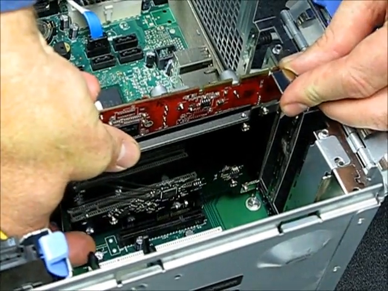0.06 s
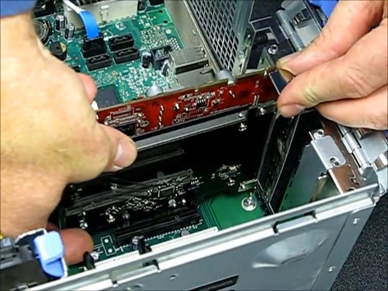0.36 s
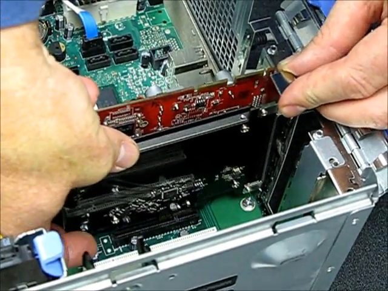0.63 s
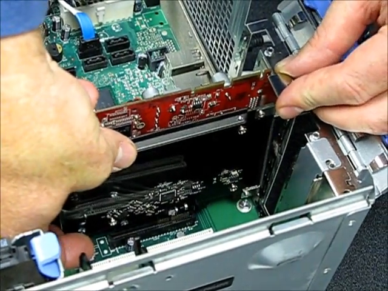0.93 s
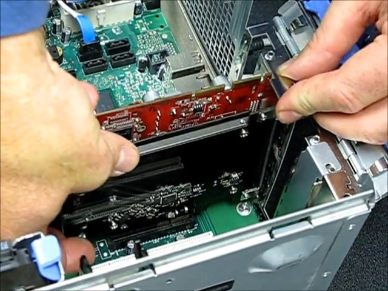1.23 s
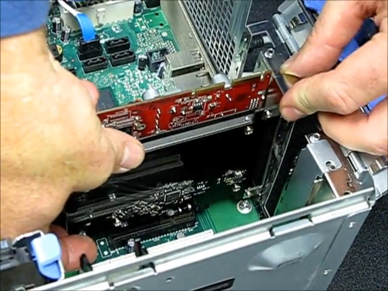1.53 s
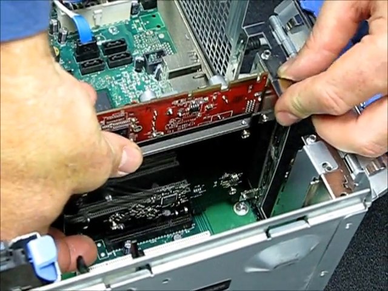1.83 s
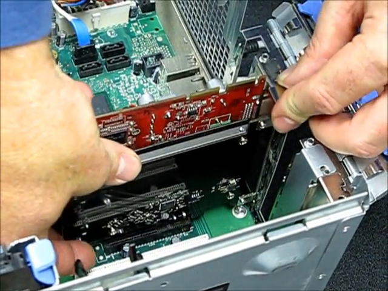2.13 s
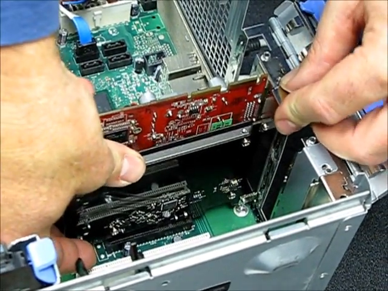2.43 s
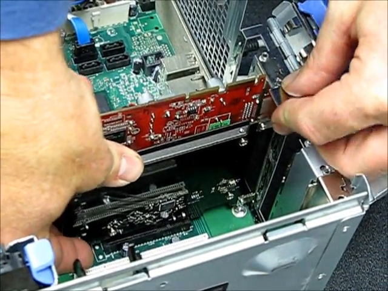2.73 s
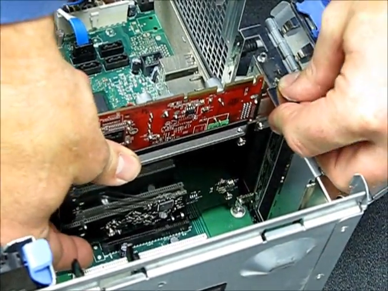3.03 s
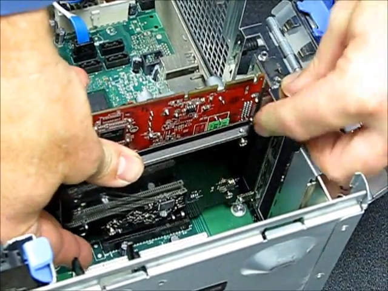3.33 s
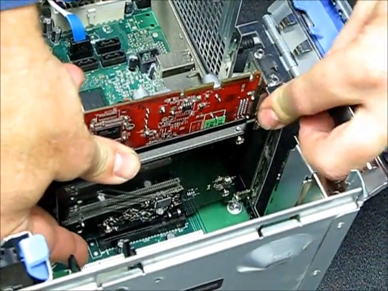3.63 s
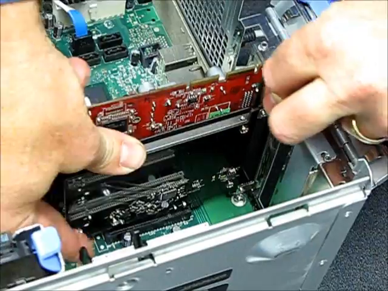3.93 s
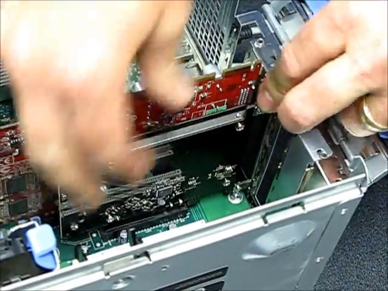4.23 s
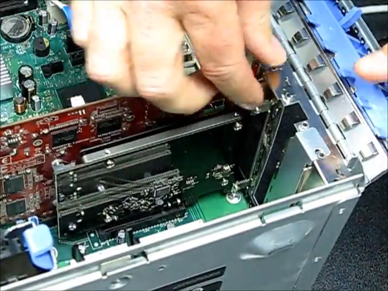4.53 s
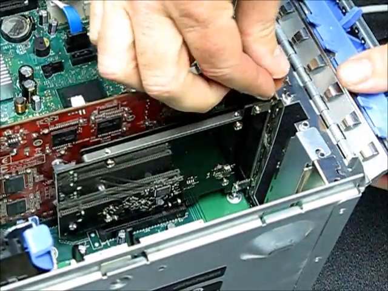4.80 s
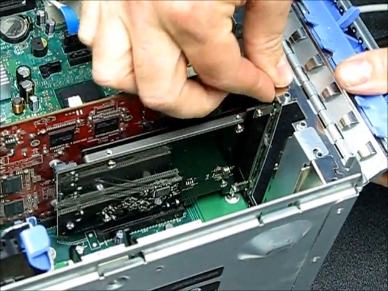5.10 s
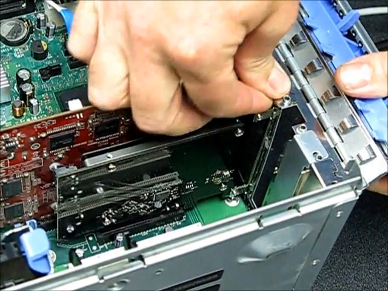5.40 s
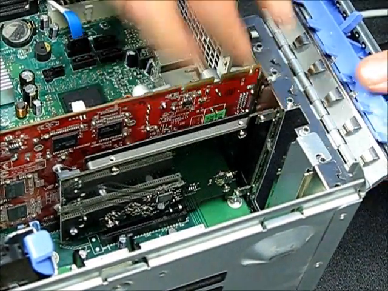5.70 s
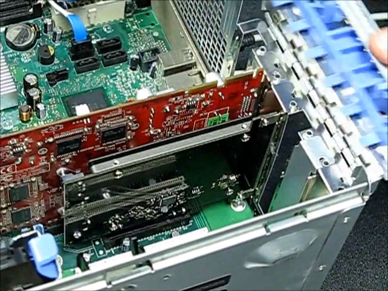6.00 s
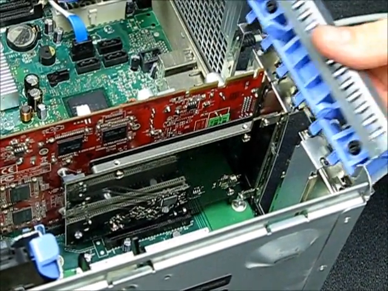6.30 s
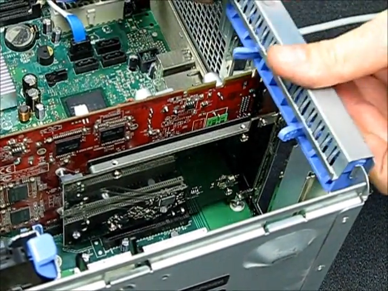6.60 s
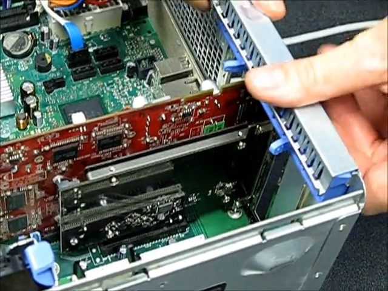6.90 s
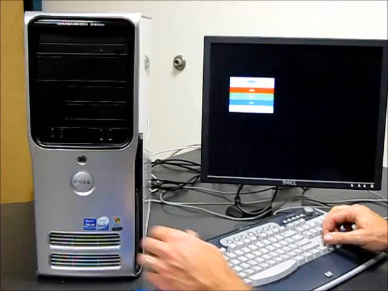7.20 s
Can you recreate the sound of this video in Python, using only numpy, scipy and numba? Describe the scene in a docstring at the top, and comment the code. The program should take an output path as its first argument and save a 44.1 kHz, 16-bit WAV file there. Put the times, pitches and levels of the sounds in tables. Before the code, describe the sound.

Close up, over a faint room hum, fingers rub softly on a circuit card while its bracket clicks and scrapes against a steel computer case. The scattered small contacts lead to a firmer crunch as the card seats. Near the end a hollow retainer chatters over and closes with one sharp snap, the loudest sound, followed by a short metallic ring.

```python
"""Seating an expansion card

Fingers work a card into an open steel computer case: its bracket taps and scrapes, and it crunches home.
A hinged retainer squeaks, chatters over and snaps shut, leaving the frame ringing. The snap overloads
a close microphone with gain control; faint hum and hiss lie beneath, broken by one short mute."""
import sys
import numpy as np
from scipy import signal
from scipy.fft import rfft, irfft
from scipy.io import wavfile
from numba import njit

SR = 44100
rng = np.random.default_rng(int(sys.argv[2]) if len(sys.argv) > 2 else 0)


def bounce(signal):
    """Save signal as a 16-bit WAV file at the path given by the first command-line argument."""
    frames = np.transpose(np.atleast_2d(signal))
    limited = np.clip(frames, -1, 1)
    pcm = np.round(limited * 32767).astype(np.int16)
    wavfile.write(sys.argv[1], SR, pcm)


N = 324135
TIME = np.arange(N) / SR
SLAM_S, MUTE_START_S, MUTE_END_S = 6.7395, 7.121, 7.2415

# body of the steel latch: f/Hz, width/Hz, gain/dB
LATCH_BODY = [(1030, 93, 4), (1420, 47, 4), (2180, 260, -4), (3200, 220, 9), (3240, 120, 8),
              (4090, 170, 13.5), (4970, 120, 14.5), (5180, 240, 24), (5500, 170, 12), (7800, 440, -4)]
# catch, slam and rebound: t/s, t60/s, thud/dB, knock/dB, clack/dB, click/dB, tick/dB
LATCH_HITS = [(6.738, 0.013, -32, -38, -18, 3, -16.5), (6.7395, 0.069, -23.5, -9.5, 1.5, 9.5, 0),
              (6.7473, 0.15, -41, -18, -13, -11, -10.5)]
def latch_snap():
    """The latch shuts in three hard hits, heard as one snap."""
    out = np.zeros(N)
    for s, t60, *band_db in LATCH_HITS:
        add(out, s, blow(t60, band_db, LATCH_BODY, crack=3))
    return out

# ring of the steel frame: f/Hz, relative level/dB, t60/s
FRAME_MODES = [(317, -47, 1.8), (346, -39.5, 1.6), (394, -34, 0.45), (544, -26.5, 0.44), (950, -57, 1.6),
               (1060, -46, 0.97), (1470, -57, 3.8), (2900, -39.5, 1.6), (3040, -43.5, 0.58),
               (3080, -39, 0.63), (3400, -56.5, 1.7), (3430, -26.5, 0.73), (3980, -38.5, 0.71),
               (3920, -42.5, 1.7), (4450, -29, 0.49), (5200, -37, 0.64), (4800, -34, 0.73),
               (5320, -41, 0.78), (5650, -24, 0.55), (5500, -34.5, 0.65), (5600, -36.5, 0.5),
               (8070, -26, 0.5), (8250, -51, 0.93), (8383, -41.5, 0.56), (10100, -36, 0.6)]
def frame_ring(gain_db=-1, flutter_hz=45, flutter_db=2, wash_db=(-38, -31, -23, -21, -27)):
    """A short low thump comes with the overloaded snap, and the frame rings over a wash of noise."""
    out = np.zeros(N)
    add(out, SLAM_S, ring([(180, 1, .012)]))  # low thump of the overload
    for mode in FRAME_MODES:
        # loosely joined sheets trade energy, so every mode flutters on its own
        flutter = undb(gain_db + flutter_db * drift(flutter_hz, SR))
        add(out, SLAM_S, flutter * ring([mode]))
    wash = contact(rng.standard_normal(SR), TIME[:SR], t60=0.69, band_db=wash_db, body=LATCH_BODY)
    add(out, SLAM_S, wash)
    return out

# body of the hollow retainer: f/Hz, width/Hz, gain/dB
RETAINER_BODY = [(715, 34, 5.3), (1015, 130, 12), (1600, 80, 8.8), (1750, 53, 8), (1870, 330, 19),
                 (2114, 130, 18), (2290, 95, 11), (2780, 160, 11), (3000, 160, 17), (5700, 170, 2.8)]
# tone of a clack: thud/dB, knock/dB, clack/dB, click/dB, tick/dB
CLACK_EQ = [-33, -10.5, 0, -7, -20.5]
# retainer chatter: t/s, level/dB, tilt/(dB/octave), t60/s, note f/Hz, note level/dB
RETAINER_CLACKS = [(6.4499, -45, 4.5, .06, 2980, -46), (6.4718, -29, -1.5, 0.29, 2130, -34),
                   (6.488, -27.5, 1.3, 0.11, 6000, -34), (6.5085, -31, 1.5, 0.13, 2800, -23.5),
                   (6.6203, -27, -0.9, 0.14, 1830, -28.5), (6.6573, -35.5, 3, .3, 2800, -41.5),
                   (6.68, -17.5, 1, 0.21, 1620, -18), (6.68, -20.5, 9.5, 0.026, 6060, -17),
                   (6.9438, -32, 2.5, .071, 3100, -31), (6.9867, -44, 8.5, 0.085, 3180, -36)]
def retainer_chatter():
    """The retainer rattles as it swings over, and settles after the snap."""
    return sum(tap(row, CLACK_EQ, RETAINER_BODY) for row in RETAINER_CLACKS)

def closing_gap(start_s=6.514, start_hz=710, fall_hz_per_s=1200, firm_db=-30):
    """The gap under the retainer gives a hollow note, then a lower one at each firm clack as it closes."""
    out = np.zeros(N)
    firm_clacks = {s for s, db, *_ in RETAINER_CLACKS if start_s < s < SLAM_S and db > firm_db}
    for s in {start_s} | firm_clacks:
        hz = start_hz - fall_hz_per_s * (s - start_s)
        add(out, s, ring([(hz, -34, 0.23)]))
    return out

# body of the card in the case: f/Hz, width/Hz, gain/dB
CASE_BODY = [(330, 38, -15.5), (539, 30, 2), (779, 34, 6.5), (934, 170, 12.5), (1558, 140, 4.5),
             (1878, 98, 8), (2112, 49, 7), (2370, 240, 3.5), (2730, 67, 8), (3017, 190, 7.5),
             (3690, 210, 1), (4680, 590, 4)]
# tone of a tap: thud/dB, knock/dB, clack/dB, click/dB, tick/dB
TAP_EQ = [-18.5, -2, 0, -3.5, -7]
# light taps and the crunch: t/s, level/dB, tilt/(dB/octave), t60/s, note f/Hz, note level/dB
CARD_TAPS = [(0.64, -37, -2, .045, 2980, -43), (0.658, -39, -6.5, 0.19, 806, -32),
             (1.1363, -43.5, -4.5, 0.069, 2990, -37), (1.2158, -53, 0, .035, 2530, -36.5),
             (1.4435, -42.5, -1, 0.068, 4900, -45), (2.8347, -29.5, .2, 0.13, 2530, -20),
             (3.1316, -40.5, -3, 0.1, 2730, -37), (3.506, -40.5, 1.7, .14, 4700, -36),
             (3.8304, -47, 0, 0.1, 985, -42), (3.8866, -47.5, 4.5, 0.15, 3260, -42),
             (4.0553, -45, 0.5, .065, 2730, -44), (4.296, -41.5, -0.5, 0.14, 3130, -36),
             (4.319, -42.5, -0.7, 0.17, 3130, -32.5), (4.7615, -45, -0.5, 0.039, 970, -45),
             (4.888, -24.5, 3, 0.1, 3340, -39), (4.9034, -24.5, -0.5, .26, 745, -21.5),
             (4.9145, -19, 3.4, 0.034, 1070, -16), (4.927, -27, 3.5, 0.16, 2330, -18),
             (5.6057, -42.5, 3, 0.048, 1010, -42)]
def card_taps():
    """Card and bracket knock against the case, then crunch into the slot."""
    return sum(tap(row, TAP_EQ, CASE_BODY) for row in CARD_TAPS)

# thunk of slot and board: f/Hz, level/dB, t60/s
SLOT_MODES = [(940, -6.5, 0.042), (131, -35, 0.17), (305.5, -33, 0.42)]
def card_seats(s=4.9145):
    """The card bottoms in its slot and both ring briefly."""
    out = np.zeros(N)
    add(out, s, ring(SLOT_MODES))
    return out

# tone of a scrape: thud/dB, knock/dB, clack/dB, click/dB, tick/dB
SCRAPE_EQ = [-8, 1, 0.5, -4, -8.5]
# short slides: peak t/s, level/dB, tilt/(dB/octave), swell/s, t60/s
CARD_SCRAPES = [(0.654, -32, -2.5, 0.0085, 0.063), (1.37, -46.5, -.5, 0.027, 0.12),
                (1.461, -40.5, -0.5, .012, 0.15), (1.586, -46.5, -.7, 0.0038, 0.22),
                (1.618, -43.5, -1.8, .025, 0.29), (1.962, -41.5, -0.5, 0.0096, .1),
                (3.338, -41.5, -1, 0.016, 0.22), (3.706, -47.5, -3.5, .006, .25),
                (3.779, -42.5, .6, 0.012, 0.21), (4.001, -49.5, 0, 0.016, .24),
                (4.12, -52.5, 2.5, .011, .14), (4.248, -47, -2, .012, 0.22),
                (4.598, -48.5, 5.5, .014, 0.13), (4.945, -27, -1.1, 0.029, 0.25),
                (5.501, -51, -4, 0.0063, 0.13), (5.613, -44.5, 4, .005, 0.12),
                (6.001, -54.5, 3, 0.057, 0.53)]
def card_scrapes(slip_hz=450, slip_db=0.5):
    """An edge sticks and slips ever harder until it catches, then the part rings out."""
    out = np.zeros(N)
    for s, db, tilt, swell, t60 in CARD_SCRAPES:
        t = TIME[:SR * 2 // 3] - 4 * swell
        friction = rng.standard_normal(len(t)) * undb(-slip_db * drift(slip_hz, len(t)))
        add(out, s + t[0], contact(friction, t, t60, tilted(SCRAPE_EQ, db, tilt), CASE_BODY, swell))
    return out

# bracket and retainer edges sliding on steel: t/s, f/Hz, level/dB
EDGE_SQUEAKS = [(.634, 4950, -48), (.638, 14300, -45), (1.445, 5000, -46), (1.573, 3000, -40.5),
                (1.595, 3180, -41), (1.619, 3180, -43.5), (1.941, 3100, -38.5), (3.755, 13000, -53),
                (4.866, 3320, -46), (6.448, 9900, -48), (6.459, 2920, -36)]
def squeaks(length_s=.032):
    """Fine friction drives one resonance, swelling and dying with the slide."""
    out, size = np.zeros(N), int(length_s * SR)
    swell = np.sin(np.linspace(0, np.pi, size))
    for s, hz, db in EDGE_SQUEAKS:
        squeak = focus(rng.standard_normal(SR // 2), hz, width_share=0.26)[-size:]
        add(out, s, level(squeak, db) * swell)
    return out

# soft bumps and the card's ring: t/s, f/Hz, level/dB
LOW_NOTES = [(0.397, 488, -43), (0.657, 902, -28.5), (1.137, 956, -36.5), (1.322, 128, -39),
             (1.366, 123, -41), (2.8345, 960, -28.5), (3.3354, 722, -29), (3.703, 748, -39),
             (4.243, 1000, -40), (4.664, 770, -44)]
def low_notes(t60=0.11):
    """Short low notes: soft bumps, and the card's ring near 950 Hz under some taps."""
    out = np.zeros(N)
    for s, hz, db in LOW_NOTES:
        add(out, s, ring([(hz, db, t60)]))
    return out

# ring of the bracket: f/Hz, relative level/dB, t60/s
BRACKET_MODES = [(2990, 10.5, 0.32), (3400, 2.5, 0.44), (3920, -2, .16), (5060, -0.5, 0.23),
                 (5760, -6.5, 0.41)]
# flicks: t/s, gain/dB
BRACKET_FLICKS = [(3.779, -58), (4.297, -49), (4.596, -50)]
def bracket_pings():
    """The flicked bracket rings thin and high."""
    out = np.zeros(N)
    for s, db in BRACKET_FLICKS:
        add(out, s, undb(db) * ring(BRACKET_MODES))
    return out

def crackle(start_s=2.9, end_s=3.3, per_s=30, gain_db=-57, spread_db=5):
    """Tiny catches of bracket and fingernails, at random moments and of random size."""
    catches, span = np.zeros(N), end_s - start_s
    for when, size in rng.random((int(per_s * span), 2)):
        add(catches, start_s + when * span, undb([gain_db + spread_db * (2 * size - 1)]))
    grain = rng.standard_normal(SR // 10) * decay(TIME[:SR // 10], t60=.04)
    return band_filter(signal.fftconvolve(catches, grain)[:N], 1, 4000, "high")

# fader curve of the rubbing: t/s, level/dB
RUB_FADER = [(0, -80), (.5, -69), (1.7, -61), (2.37, -50), (3.1, -68), (3.8, -53.5), (4.4, -67),
             (4.7, -54.5), (5.4, -59), (5.8, -70.5), (7.35, -72.5)]
def finger_rub(grain_hz=60, grain_db=3, band_hz=(300, 900)):
    """Skin rubs unevenly on the board, which passes it to the case."""
    friction = rng.standard_normal(N) * undb(grain_db * drift(grain_hz, N))
    rub = resonate(band_filter(friction, 1, band_hz), CASE_BODY)
    return level(rub, 0) * undb(np.interp(TIME, *np.transpose(RUB_FADER)))

# spectrum of the room tone: f/Hz, relative level/dB
AIR_EQ = [(12, -45.5), (20, -7), (65, 1.5), (86, -17.5), (101, -5.5), (123, 1), (150, -8.5), (193, -9),
          (357, -8), (485, -12), (590, -9), (1060, -13), (2820, -15), (14300, -26), (16000, -34)]
# mains hum: f/Hz, level/dB
HUM_TONES = [(59.5, -72.5), (119.5, -65), (299, -85)]
def room_tone(air_db=-49.75):
    """A steady bed of hiss, rumble and mains hum."""
    hz, db = np.transpose(AIR_EQ)
    bin_hz = np.maximum(np.arange(N // 2 + 1) * SR / N, 1)
    spectrum = undb(np.interp(np.log(bin_hz), np.log(hz), db))
    air = irfft(rfft(rng.standard_normal(N)) * spectrum, N)
    hum = sum(level(np.sin(2 * np.pi * f * TIME), tone_db) for f, tone_db in HUM_TONES)
    return level(air, air_db) + hum

def tap(row, eq, body, note_t60_share=0.74):
    """A blow on a body; the struck spot favours a cluster of close modes, heard as its note."""
    s, db, tilt, t60, note_hz, note_db = row
    out = np.zeros(N)
    add(out, s, blow(t60, tilted(eq, db, tilt), body, crack=5))
    fade = decay(TIME[:SR // 2], note_t60_share * t60)
    note = focus(rng.standard_normal(len(fade)) * fade, note_hz, width_share=0.21)
    add(out, s, undb(note_db) * match_energy(note, fade) / np.sqrt(2))
    return out

def blow(t60, band_db, body, crack):
    """A sharp crack followed by a dense wash of panel modes."""
    force = rng.standard_normal(SR // 2)
    force[0] = crack
    return contact(force, TIME[:SR // 2], t60, band_db, body)

# crossovers bounding the thud, knock, clack, click and tick bands: f/Hz
BAND_EDGES = [100, 600, 1300, 3600, 7000, 16500]
def contact(force, t, t60, band_db, body, swell=0, damping=0.2):
    """A force shakes a body; t counts from its peak. Highs die sooner; the room holds a faint tail."""
    out, after = 0, np.maximum(t, 0)
    rise = np.exp(np.minimum(t, 0) / swell) if swell else 1
    room_tail = undb(-23) * decay(after, t60=0.4)
    for low, high, db in zip(BAND_EDGES, BAND_EDGES[1:], band_db):
        band_t60 = t60 * (np.sqrt(low * high) / 2000) ** -damping
        fade = rise * np.hypot(decay(after, band_t60), room_tail)
        band = resonate(band_filter(force * fade, 3, [low, high]), body)
        out += undb(db) * match_energy(band, fade)
    return out

def tilted(eq, db, tilt, pivot_hz=2000):
    """Band levels of a contact: hard edges tilt bright, padded ones dull."""
    centres = np.sqrt(np.multiply(BAND_EDGES[:-1], BAND_EDGES[1:]))
    return db + np.array(eq) + tilt * np.log2(centres / pivot_hz)

def ring(modes):
    """One second of freely decaying modes, each given as f/Hz, level/dB, t60/s."""
    t = TIME[:SR]
    return sum(undb(db) * decay(t, t60) * np.sin(2 * np.pi * hz * t) * rng.choice([-1, 1])
               for hz, db, t60 in modes)

def resonate(x, body):
    """The direct sound plus the resonances of a body."""
    return x + sum(undb(db) * signal.lfilter(*signal.iirpeak(hz, hz / width, fs=SR), x)
                   for hz, width, db in body)

def focus(x, hz, width_share):
    """Two passes through one resonance give noise a pitch."""
    peak = signal.iirpeak(hz, 1 / width_share, fs=SR)
    return signal.lfilter(*peak, signal.lfilter(*peak, x))

def band_filter(x, order, hz, kind="band"):
    """Keep one range of frequencies."""
    return signal.sosfilt(signal.butter(order, hz, kind, fs=SR, output="sos"), x)

def drift(rate_hz, size):
    """Smooth random drift with a spread near 1."""
    position = np.arange(size) / SR * rate_hz
    knots = rng.standard_normal(int(position[-1]) + 2)
    return np.interp(position, np.arange(len(knots)), knots)

def decay(t, t60):
    """Fade by 60 dB every t60 seconds."""
    return np.exp(-np.log(1000) * t / t60)

def undb(db):
    """Decibels to gain."""
    return 10 ** (np.asarray(db) / 20)

def level(x, db):
    """Set the rms level."""
    return x * undb(db) / np.sqrt(np.mean(x ** 2))

def match_energy(x, envelope):
    """Give a sound the energy of an envelope."""
    return x * np.sqrt(np.sum(envelope ** 2) / np.sum(x ** 2))

def add(out, s, sound):
    """Mix a sound in from a given time."""
    start = int(s * SR)
    out[start:start + len(sound)] += sound[:N - start]

def scene():
    """Everything at one close microphone; only the room tone outlasts the mute."""
    retainer = latch_snap() + frame_ring() + retainer_chatter() + closing_gap()
    card = card_taps() + card_seats() + card_scrapes()
    details = squeaks() + low_notes() + bracket_pings() + crackle() + finger_rub()
    handling = (retainer + card + details) * (TIME < MUTE_START_S)
    return (handling + room_tone())[None]

@njit
def follow(x, attack, release):
    """Level detector that rises fast and falls slowly."""
    out, held = np.empty(len(x)), 0.
    for i in range(len(x)):
        held += (abs(x[i]) - held) * attack if abs(x[i]) > held else -held * release
        out[i] = held
    return out

def mute(x, bump_db=-38, bump_s=0.04):
    """The sound drops out briefly and returns with a soft bump."""
    bump = undb(bump_db) * np.exp(-np.maximum(TIME - MUTE_END_S, 0) / bump_s)
    return x * (TIME < MUTE_START_S) + (x - bump) * (TIME > MUTE_END_S)

def record(dry, threshold_db=-11, attack_s=0.0033, release_s=0.097, top_hz=15800):
    """Gain control ducks after the snap, whose first cycles clip; the mute follows and the top is cut."""
    held = follow(dry[0], 1 / (attack_s * SR), 1 / (release_s * SR))
    ducked = dry / np.maximum(held / undb(threshold_db), 1)
    clipped = np.clip(ducked, -.8, .8)
    top_cut = signal.ellip(12, .1, 90, top_hz, fs=SR, output="sos")
    return signal.sosfiltfilt(top_cut, mute(clipped))

dry = scene()
out = record(dry)
bounce(out)
```